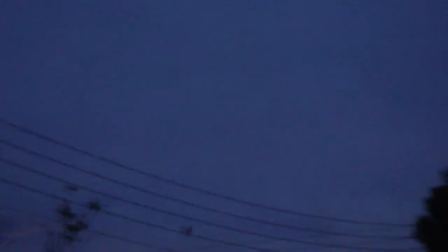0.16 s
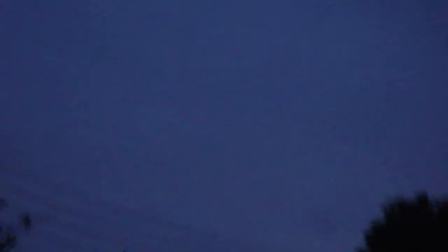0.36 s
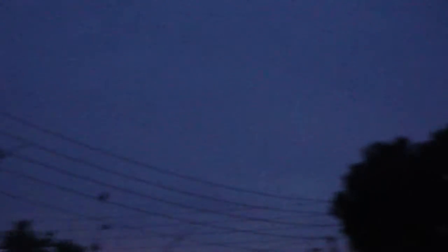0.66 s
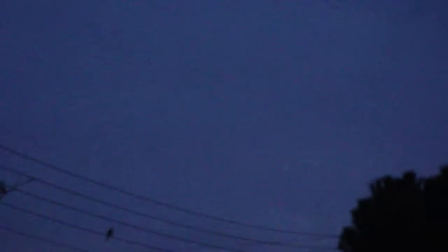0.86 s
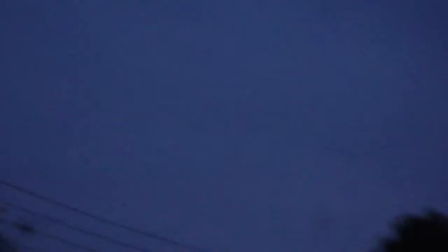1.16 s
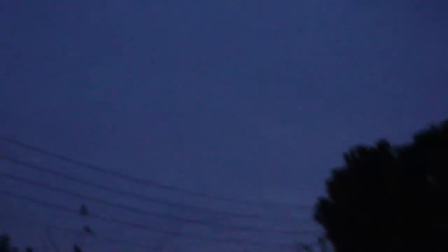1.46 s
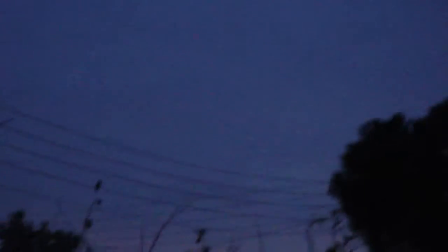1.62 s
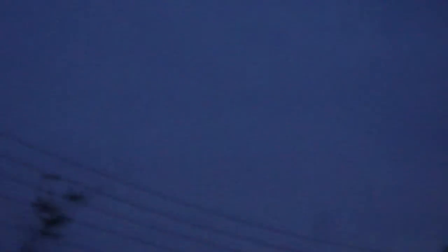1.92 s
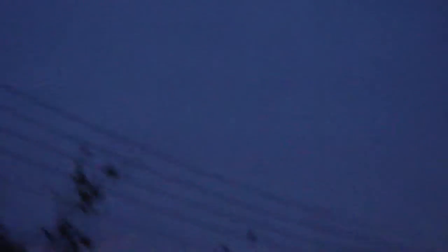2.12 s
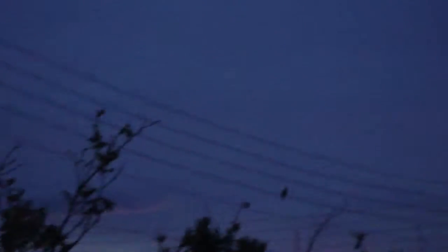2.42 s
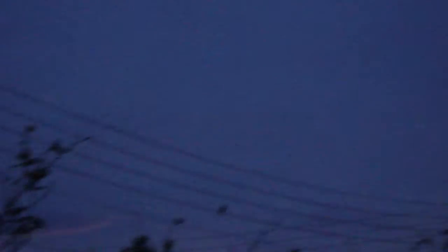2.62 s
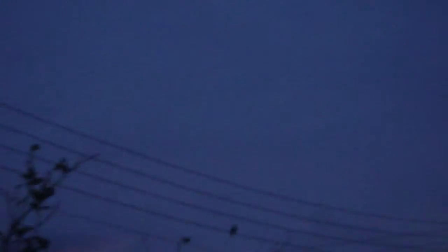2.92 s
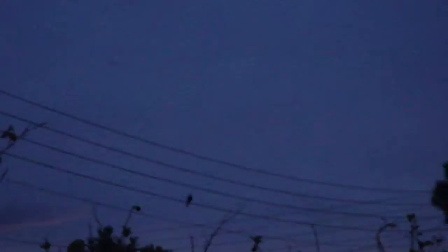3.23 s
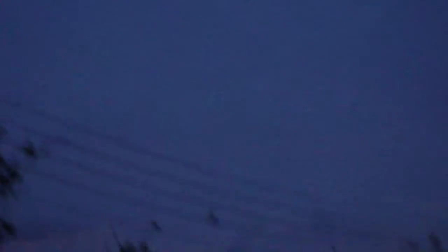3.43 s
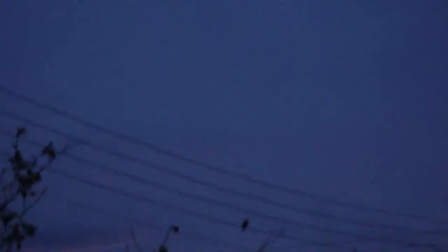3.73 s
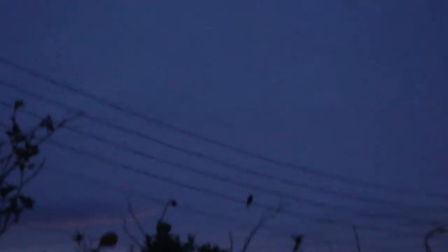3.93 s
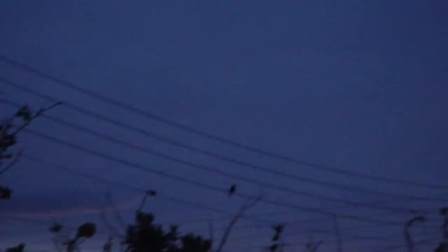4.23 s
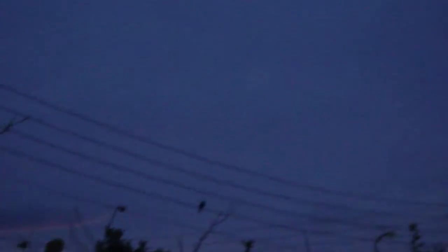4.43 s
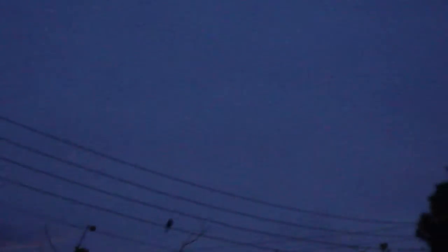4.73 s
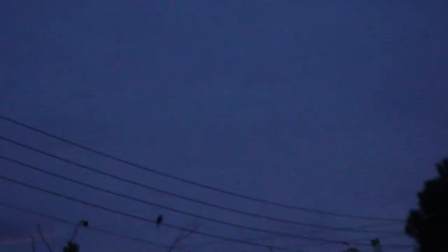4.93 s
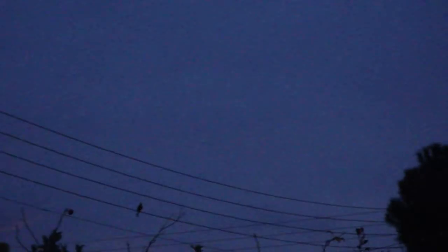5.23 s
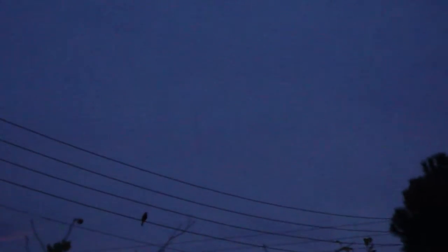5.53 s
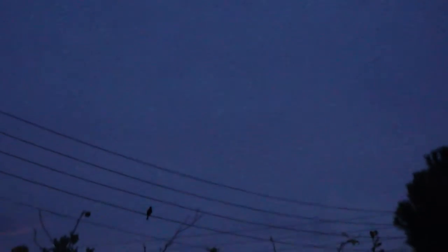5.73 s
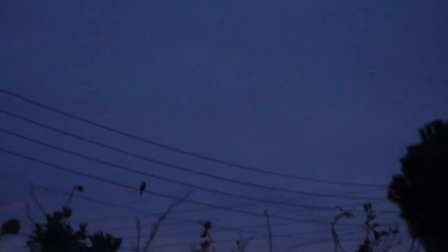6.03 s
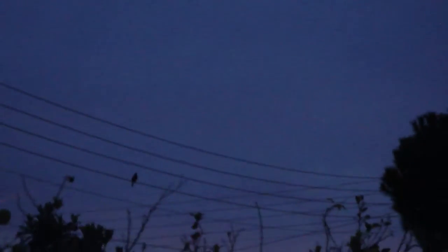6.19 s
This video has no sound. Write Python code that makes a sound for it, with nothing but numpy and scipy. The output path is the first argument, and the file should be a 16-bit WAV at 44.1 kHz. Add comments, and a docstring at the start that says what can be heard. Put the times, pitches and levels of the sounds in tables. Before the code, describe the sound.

A quiet outdoor dusk with soft distant town rumble, a thin faint hum and light leaf or cloth rustle. Far birds whistle at once; from 0.35 to 0.8 s a near blackbird gives a mellow fluted, wavering phrase. A reedy note follows at 0.9-1.1, a smooth whistle at 1.15, then a quick warbled roll from 1.35 to 1.65. At 1.95-2.3 come high squeaky notes and two falling swoops. The near bird then rests while distant whistles answer around 2.4-4.1, with blurred chatter and a very soft hoot near 3.1-3.6. Dull twig-like snaps and bright handling ticks are scattered throughout. From 4.9 the blackbird resumes with a low rising warble, a strong whistle at 5.3, a falling waver, then a high trill from 5.75, fading to a thin twitter by 6.35. Low wind puffs thump between 4.6 and 5.6. Light garden echoes surround the song.

```python
"""A blackbird sings in front: near-sine pitch paths with a faint octave make its fluted notes, slurs, warbles,
rolls, swoops and high trills, with one reedy partial stack; smeared echoes from walls and leaves answer it.
Far birds whistle and chatter in short gliding sines, and a soft hoot sounds once, over noise-band town rumble.
Snaps ring woody modes close by, a hand-held recorder ticks with bright clicks, leaves and cloth rustle as grains,
and wind hits the recorder's port as low noise and single puffs."""
import sys
import numpy as np
from scipy import signal
from scipy.io import wavfile

SR = 44100
rng = np.random.default_rng(int(sys.argv[2]) if len(sys.argv) > 2 else 0)


def wav_record(signal):
    """Record a signal, one row per channel, as 16-bit PCM in the file named by sys.argv[1]."""
    frames = np.transpose(np.atleast_2d(signal))
    bounded = np.clip(frames, -1, 1)
    # unit amplitude maps onto the largest positive 16-bit level
    quanta = np.round(bounded * 32767).astype(np.int16)
    wavfile.write(sys.argv[1], SR, quanta)


N = 280476


def from_db(db):
    """Amplitude ratio of a level in dB."""
    return 10 ** (np.asarray(db) / 20)


def rms_one(x):
    """Scale a signal to an RMS of 1."""
    return x / np.sqrt(np.mean(x ** 2) + 1e-20)


def band(x, low_hz, high_hz):
    """Band-pass filter with gentle skirts."""
    return signal.sosfilt(signal.butter(2, [low_hz, high_hz], "band", fs=SR, output="sos"), x)


def drift(rate_hz):
    """Slow random wander of RMS 1: noise through two equal one-pole low-passes."""
    r = np.exp(-2 * np.pi * rate_hz / SR)
    settled = signal.lfilter([1], [1, -2 * r, r * r], rng.standard_normal(N + SR))[SR:]
    return rms_one(settled)


def glide(t, s, v):
    """Smooth path through points: level at each inner turning point, never overshooting, as muscles move."""
    step = np.diff(v) / np.diff(s)
    product = step[1:] * step[:-1]
    inner = np.where(product > 0, 2 * product / (step[1:] + step[:-1] + 1e-12), 0)
    slope = np.r_[step[0], inner, step[-1]]
    k = np.clip(np.searchsorted(s, t) - 1, 0, len(s) - 2)
    h = s[k + 1] - s[k]
    u = (t - s[k]) / h
    ease = (v[k + 1] - v[k]) * u * u * (3 - 2 * u)
    bend = h * u * (1 - u) * (slope[k] * (1 - u) - slope[k + 1] * u)
    return v[k] + ease + bend


def columns(rows):
    """Sample numbers of a note and its columns glided along them."""
    s, *rest = np.transpose(rows)
    at = np.arange(int(s[0] * SR), min(int(s[-1] * SR), N))
    return at, [glide(at / SR, s, c) for c in rest]


def slur(start, length, turn, first_hz, turn_hz, last_hz, db, edge_db):
    """Three-point path: the level peaks at the turn and starts and ends edge_db under it."""
    turn_s = start + length * np.clip(turn, .1, .9)
    return [(start, first_hz, db - edge_db), (turn_s, turn_hz, db), (start + length, last_hz, db - edge_db)]


def add(out, at, hz, level_db, partials):
    """Sum of (multiple, dB) partials on a moving pitch, faded in and out over 2 ms."""
    phase = 2 * np.pi * np.cumsum(hz) / SR
    fade = np.clip(np.minimum(at - at[0], at[-1] - at) / 90, 0, 1)
    for multiple, db in partials:
        in_range = multiple * hz < SR / 3
        # the root of two makes the level an RMS level
        out[at] += np.sqrt(2) * fade * from_db(level_db + db) * np.sin(multiple * phase) * in_range


SPELL_EDGE_S = 0.077


def spells(t, rows):
    """How far (0-1) each spell, given by its start and length, is under way at times t."""
    return np.array([np.clip(np.minimum(t - row[0], row[0] + row[1] - t) / SPELL_EDGE_S + .5, 0, 1)
                     for row in rows])


SCATTER_T60_S = 0.72
# Wall echoes, before the treble lift: delay [t/s], level [level/dB], smear [t/s]
WALL_ECHOES = [(0.011, -6.5, 0.007), (0.028, -13, 0.0085), (0.044, -9, 0.0029), (.073, -11.5, 0.0022),
               (.12, -18.5, .018), (0.189, -26, 0.017), (.268, -34, 0.027)]


def garden(x, wet_db):
    """A few smeared wall echoes and a diffuse tail scattered by leaves, added to the direct sound."""
    t = np.arange(SR) / SR
    tail = rng.standard_normal(SR) * from_db(-60 * t / SCATTER_T60_S) * np.clip((t - .004) / 0.027, 0, 1)
    tail = from_db(wet_db) * tail / np.sqrt(np.sum(tail ** 2))
    for delay, db, width in WALL_ECHOES:
        smear = rng.standard_normal(SR) * np.exp(-((t - delay) / width) ** 2)
        tail += from_db(db) * smear / np.sqrt(np.sum(smear ** 2))
    bright_tail = signal.lfilter([1, -.15], [1], tail)  # leaves scatter the highs best
    return x + signal.fftconvolve(x, bright_tail)[:N]


# Shape of the town's spectrum: centre [f/Hz], relative density [level/dB per Hz]
TOWN_SPECTRUM = [(15, -65), (25, -54), (152, -9.5), (186, -17.5), (228, 2), (272, -6.5), (453, -2.5),
                 (584, -1), (697, -1.5), (876, -2), (1020, -4.5), (1610, -9.5), (2300, -8), (3120, -14),
                 (10800, -26.5), (14100, -63), (22000, -120)]
TOWN_DB = -51.5  # RMS of all bands together
# Thin hum: pitch [f/Hz], level before its lift and waver [level/dB]
HUM = [(301.5, -67.5)]


def town():
    """Far traffic and air as half-octave noise bands that waver slightly together, with a thin hum."""
    rumble, edges = 0, 22 * 2 ** np.arange(0, 9.2, .5)
    white = rng.standard_normal((2, N))  # alternate bands use separate noise
    spectrum_hz, spectrum_db = np.transpose(TOWN_SPECTRUM)
    together = drift(2.95)
    for k, (low, high) in enumerate(zip(edges, edges[1:])):
        level_db = np.interp(np.log(low * high) / 2, np.log(spectrum_hz), spectrum_db)
        rumble = rumble + from_db(level_db + 0.46 * together) * band(white[k % 2], low, high)
    t = np.arange(N) / SR
    hum = sum(from_db(db + 2.5 + 2.9 * drift(15.0)) * np.sin(2 * np.pi * hz * t) for hz, db in HUM)
    return from_db(TOWN_DB) * rms_one(rumble) + hum


# Wind on the port, calm and then gusty: time [t/s], level before the gusts waver [level/dB]
WIND_PATH = [(0, -72.5), (4.44, -72), (4.58, -56), (4.7, -61), (4.85, -52), (5.0, -58), (5.15, -62),
             (5.3, -56), (5.5, -54), (5.86, -67), (6.11, -60), (6.25, -70), (6.36, -56)]
# Wind puffs on the port: time [t/s], peak [level/dB]
PUFFS = [(4.558, -43), (4.74, -39), (4.814, -42), (4.867, -28.5), (4.888, -25.5), (4.897, -29.5),
         (4.911, -34), (4.945, -43), (5.067, -43), (5.218, -34), (5.226, -23), (5.245, -36), (5.268, -40),
         (5.285, -36), (5.343, -32), (5.464, -32.5), (5.501, -27), (5.532, -36.5), (5.562, -42),
         (5.627, -42)]
PUFF_HZ = 197.6


def wind():
    """Low noise in small lumpy gusts; each puff is a suck and a rebound, a short wave under a bell curve."""
    level_db = np.interp(np.arange(N) / SR, *np.transpose(WIND_PATH))
    out = from_db(level_db + 3.1 * drift(7.6)) * rms_one(band(rng.standard_normal(N), 55, 190))
    offset = np.arange(-400, 900)
    t = offset / SR
    puff = np.cos(2 * np.pi * PUFF_HZ * t + 0.23) * np.exp(-(2.14 * PUFF_HZ * t - .1) ** 2)
    for s, db in PUFFS:
        at = np.clip(int(s * SR) + offset, 0, N - 1)
        out[at] -= from_db(db) * puff
    return out


RUSTLE_DB = -63.0  # steady level
# Livelier rustling: start [t/s], length [t/s], lift over steady [level/dB]
RUSTLE_SPELLS = [(.27, 0.14, 3.5), (2.5, 0.23, 4.8), (4.18, 0.24, 5.2)]


def rustle():
    """Dense tiny clicks of leaves and cloth: random grains in a treble band."""
    lift_db = np.transpose(RUSTLE_SPELLS)[2] @ spells(np.arange(N) / SR, RUSTLE_SPELLS)
    size = from_db(0.7 * np.minimum(rng.exponential(1, N), 4))
    grains = size * rng.standard_normal(N) * (rng.random(N) < .2)
    return from_db(RUSTLE_DB + lift_db) * rms_one(band(grains, 2470, 11100))


CHATTER_DB, CHATTER_HZ = -75, 2517  # steady level and centre, between spells
CHATTER_SPREAD_DB = 11  # full range from the softest to the loudest chip
# Spells of louder chatter: start [t/s], length [t/s], lift over steady [level/dB], centre [f/Hz]
CHATTER_SPELLS = [(.4, 1.6, 10.5, 2976), (3.149, 0.17, 14, 3790), (3.6, 0.41, 10, 2534),
                  (4.0, 0.53, 15.4, 2597)]


def chatter():
    """Blurred far birds: many short chips at random moments, louder and moved in pitch during spells."""
    out, (_, _, more_db, spell_hz) = np.zeros(N), np.transpose(CHATTER_SPELLS)
    for when, high, slant, loud in rng.random((1100, 4)):
        start = when * (N / SR - .03)
        under_way = spells(start, CHATTER_SPELLS)
        centre_hz = CHATTER_HZ + under_way @ (spell_hz - CHATTER_HZ)
        pitch = centre_hz * (1 + 0.568 * (high - .5))
        at, (path,) = columns([(start, pitch), (start + 0.0078, pitch * (1 + 0.28 * (slant - .4)))])
        level_db = CHATTER_DB + under_way @ more_db + CHATTER_SPREAD_DB * (loud - .5)
        add(out, at, path, level_db, [(1, 0.0082)])
    return out


# Far whistles: start [t/s], length [t/s], turn [share 0-1], start, turn and end pitch before the 0.99 tuning
# and waver [f/Hz], peak before the level waver [level/dB]
FAR_NOTES = [(0.001, 0.11, .3, 3250, 3290, 3330, -64), (0.119, .17, 0.62, 2180, 2560, 2610, -51),
             (0.306, 0.16, .4, 2566, 2560, 2520, -52), (0.51, 0.059, .3, 4040, 3950, 3530, -63),
             (2.407, 0.1, .6, 2620, 2643, 2640, -49.5), (2.619, 0.13, .6, 2010, 2348, 2370, -42),
             (2.706, .19, .4, 2364, 2362, 2198, -41.5), (2.76, .14, .5, 2500, 2600, 2510, -53),
             (2.7, 0.25, 0.43, 1990, 2200, 2040, -51.5), (2.909, 0.083, .5, 2673, 2830, 2900, -47),
             (2.989, 0.072, .45, 2846, 2678, 2900, -41.5), (3.626, 0.2, .6, 2120, 2310, 2364, -52),
             (3.758, .12, 0.27, 2370, 2336, 2276, -51.5), (3.961, 0.104, .3, 2523, 2546, 2565, -50.5),
             (4.036, 0.15, 0.14, 1965, 1963, 1945, -56.5), (4.549, 0.2, 0.4, 1910, 1915, 1805, -61),
             (4.89, 0.074, .54, 2260, 2265, 2230, -57), (5.531, 0.171, 0.85, 2390, 2515, 2440, -43)]
FAR_EDGE_DB, FAR_WAVER_HZ = 5.5, 25.5  # drop at each end; RMS pitch waver before tuning
# Far chip runs: start [t/s], end [t/s], gap [t/s], middle level before scatter and waver [level/dB],
# first and last starting pitch before the 0.98 tuning and scatter [f/Hz]
CHIP_RUNS = [(3.142, 3.348, .024, -56, 3420, 3970), (4.287, 4.43, .042, -54.5, 2590, 2310)]
CHIP_S, CHIP_RISE = 0.014, 1.2  # chip length and pitch ratio from start to end
CHIP_SPREAD_DB, CHIP_SPREAD = 2.5, .04  # scatter of level, and of pitch as a share


def far_birds():
    """Plain whistles wavering in pitch and runs of short rising chips, all with a flickering level."""
    out, waver = np.zeros(N), FAR_WAVER_HZ * drift(9.1)
    for row in FAR_NOTES:
        at, (hz, db) = columns(slur(*row, FAR_EDGE_DB))
        add(out, at, hz + waver[at], db, [(0.99, 0.01)])
    for start, end, gap, db, first_hz, last_hz in CHIP_RUNS:
        for s, (loud, high) in zip(np.arange(start, end, gap), rng.standard_normal(size=(16, 2))):
            hz = np.interp(s, [start, end], [first_hz, last_hz]) * (1 + CHIP_SPREAD * high)
            at, (path,) = columns([(s, hz), (s + CHIP_S, hz * CHIP_RISE)])
            add(out, at, path, db + CHIP_SPREAD_DB * loud, [(0.98, 0)])
    return out * from_db(3.6 * drift(38) - 3.0)


# Faint hoot: start [t/s], length [t/s], turn [share 0-1], start, turn and end pitch [f/Hz],
# peak before the level waver [level/dB]
HOOT = (3.1, .55, .6, 1004, 1006, 1000, -57)


def hoot():
    """One soft plain tone of nearly steady pitch whose level wavers."""
    out = np.zeros(N)
    at, (hz, db) = columns(slur(*HOOT, edge_db=6.5))
    add(out, at, hz, db + 4.2 * drift(7.1)[at], [(1, 0)])
    return out


# Dull twig snaps close by: time [t/s], relative strength [level/dB]
SNAPS = [(.281, -28.5), (0.33, -40), (0.435, -32), (.974, -32), (0.993, -41), (1.02, -34), (1.496, -37),
         (1.921, -41), (1.935, -31), (2.539, -32), (2.604, -36.5), (2.624, -35), (2.666, -36), (3.418, -37),
         (3.426, -35.5), (3.503, -35)]
# Bright ticks under the fingers: time [t/s], relative strength [level/dB]
TICKS = [(0.2993, -37), (.3174, -44), (0.4428, -35.5), (2.633, -42), (3.9323, -40), (4.2097, -39.5),
         (4.3424, -43), (5.0565, -40), (5.4442, -43)]
# Woody modes of a snapping twig: pitch [f/Hz], relative strength [level/dB], time to fall 60 dB [t/s]
TWIG_MODES = [(730, -24, 0.0075), (1262, -2, 0.013), (1690, 9.5, 0.0036), (2440, -6.5, 0.016)]
CREAK_S, CREAK_DB = .005, -3.5  # typical lead and relative level of the crack before each snap
SNAP_WET_DB = -11.5


def handling():
    """Snaps, each led by a fainter crack, ring a few woody modes; ticks are bare bright clicks."""
    snaps = np.zeros(N)
    creaks = [(s - CREAK_S * rng.uniform(0.63, 1.34), db + CREAK_DB) for s, db in SNAPS]
    s, db = np.transpose(SNAPS + creaks)
    for hz, mode_db, t60 in TWIG_MODES:
        clicks = np.full(N, 1e-18)
        clicks[(s * SR).astype(int)] = from_db(db + mode_db - 6.0 + rng.normal(0, 1.9, len(s)))
        r, w = from_db(-60 / (t60 * SR)), 2 * np.pi * hz / SR
        snaps += signal.lfilter([0, np.sin(w)], [1, -2 * r * np.cos(w), r * r], clicks)
    s, db = np.transpose(TICKS)
    ticks = np.full(N, 1e-18)
    ticks[(s * SR).astype(int)] = from_db(db + 17.0)
    return garden(band(snaps, 690, 5100), SNAP_WET_DB) + band(ticks, 2700, 7200)


# Resonance near the beak: centre [f/Hz], width [f/Hz], strength against the fundamental [level/dB]
BEAK = (10500, 4500, -35.5)


def flute(hz, overtone_db):
    """A near-sine with its octave; faint upper partials show only where they meet the beak resonance."""
    beak_hz, width_hz, beak_db = BEAK
    upper = [(k, beak_db - 9.5 * ((k * hz - beak_hz) / width_hz) ** 2) for k in (3, 4, 5)]
    return [(1, 0.0034), (2, overtone_db)] + upper


OCTAVE_DB_PER_OCT = 11  # octave overtone's gain as a note dips under its median pitch
OCTAVE_STAYS = 0.75  # dB regained against the fundamental for each dB the note softens
THROAT_HZ, THROAT_DB_PER_OCT = 1790, 52  # below the throat's range the octave takes over


def voiced(at, hz, db, overtone_db):
    """A fluted note; the lower or softer it gets, the more its octave shows."""
    out = np.zeros(N)
    dip = OCTAVE_DB_PER_OCT * np.log2(np.median(hz) / hz)
    throat = THROAT_DB_PER_OCT * np.maximum(np.log2(THROAT_HZ / hz), 0)
    softening = OCTAVE_STAYS * (db.max() - db)
    add(out, at, hz, db, flute(hz, overtone_db + dip + throat + softening))
    return out


def sing_path(overtone_db, rows):
    """One fluted note along a path of time, pitch and level."""
    at, (hz, db) = columns(rows)
    return voiced(at, hz, db, overtone_db)


# The bird's levels below all stand before its shimmer; octave levels stand before the voice shapes them.
# Held notes: octave against the fundamental [level/dB], path of time [t/s], pitch [f/Hz], level [level/dB]
HELD_NOTES = [ (-30.5, [(.345, 2065, -48), (.365, 2192, -40), (.385, 2110, -37.5), (.408, 1308, -59.5),
              (.425, 1943, -37.5), (.44, 2188, -30.5), (.48, 2028, -31.5), (.53, 1993, -32),
              (.545, 1810, -47)]), (-35, [(1.135, 2230, -38.5), (1.16, 2406, -29), (1.2, 2368, -28),
              (1.235, 2063, -34)]), (-31.5, [(1.945, 2160, -64), (1.955, 3450, -42), (1.962, 5300, -65),
              (1.972, 3370, -35), (1.98, 2510, -39), (1.99, 3290, -36.5), (2.003, 2610, -41),
              (2.02, 3286, -30.5), (2.048, 4010, -40), (2.06, 3300, -44), (2.085, 3940, -48),
              (2.11, 3600, -58)]), (-39, [(5.23, 2027, -37.5), (5.26, 2220, -32.5), (5.33, 2382, -23),
              (5.4, 2514, -30), (5.435, 2424, -34)]), (-25.5, [(5.732, 6730, -66), (5.74, 4140, -23.5),
              (5.745, 5810, -51), (5.751, 4460, -22), (5.76, 4790, -27), (5.772, 4100, -39)])]


def held_notes():
    """Longer fluted notes, each following its own pitch path."""
    return sum(sing_path(overtone_db, path) for overtone_db, path in HELD_NOTES)


SLUR_EDGE_DB = 6.0
# Short slurs: start [t/s], length [t/s], turn [share 0-1], start, turn and end pitch [f/Hz],
# peak [level/dB], octave against the fundamental [level/dB]
SLURS = [(1.454, 0.011, 0.3, 1900, 2725, 1880, -25, -18), (1.464, 0.00765, 0.5, 2280, 1640, 1070, -34, -41),
         (1.372, 0.016, 0.42, 2820, 2890, 2930, -29, -22), (1.955, 0.018, 0.34, 1760, 2700, 2040, -38, -22),
         (2.015, .04, 0.7, 1510, 1976, 2000, -44, -27), (2.505, 0.082, 0.32, 2650, 2350, 1560, -45, -27),
         (5.465, .03, 0.68, 2496, 2840, 3100, -31.5, -26), (5.729, 0.01, 0.57, 4010, 2920, 2520, -32, -9.5),
         (6.206, 0.018, .45, 2530, 2940, 3400, -36.5, -11)]


def slurs(rows=SLURS):
    """Quick fluted glides, loudest at the turn."""
    return sum(sing_path(row[-1], slur(*row[:-1], SLUR_EDGE_DB)) for row in rows)


# Falling swoop, the two sides of the syrinx: time from its mark [t/s], pitch [f/Hz], level before gain [level/dB]
SWOOP_SIDES = [
    [(-.046, 5920, -57), (-.026, 6100, -48), (-.01, 5560, -41), (.004, 4740, -38.5), (.017, 3523, -33),
     (.026, 2955, -34.5)],
    [(-.01, 5200, -63), (0, 4260, -28.5), (.012, 3350, -32), (.027, 2960, -34.5), (.039, 2828, -39.5),
     (.051, 2190, -49)],
]
# Swoop repeats: mark [t/s], gain [level/dB]
SWOOPS = [(2.149, 1.5), (2.284, -1.7)]
SWOOP_OVERTONE_DB = -22.5


def swoops():
    """Falling cries in which both sides of the syrinx sound overlapping paths."""
    return sum(sing_path(SWOOP_OVERTONE_DB, np.array(side) + [mark, 0, gain_db])
               for mark, gain_db in SWOOPS for side in SWOOP_SIDES)


# Trill syllable: position [share of length], pitch [f/Hz], level before gain [level/dB]
TRILL_SYLLABLE = [(-.08, 7600, -44), (.02, 5900, -36.5), (.15, 4400, -27), (.52, 4790, -26.5),
                  (.8, 4680, -28.5), (1.0, 4350, -38)]
# Trill repeats: mark [t/s], length [t/s], gain [level/dB]
TRILLS = [(5.8, .029, 2.0), (5.862, .029, 1.0), (5.922, .026, -1.0), (5.983, .022, -2.5),
          (6.047, .021, -4.0), (6.118, .018, -8.0)]
# Lower slur leading into each syllable but the last: start from the mark [t/s], then the columns of SLURS
LEAD_IN = (-.021, .018, .35, 4060, 3800, 3300, -35.5, -12)
TRILL_OVERTONE_DB = -26


def trills():
    """High syllables on one stretched shape, each but the last led in by a lower slur."""
    lead_ins = [(mark + LEAD_IN[0], *LEAD_IN[1:]) for mark, *_ in TRILLS[:-1]]
    syllables = sum(sing_path(TRILL_OVERTONE_DB, np.array(TRILL_SYLLABLE) * [length, 1, 1] + [mark, 0, gain_db])
                    for mark, length, gain_db in TRILLS)
    return syllables + slurs(lead_ins)


# Warbles: (a crest [t/s], swing rate [f/Hz], lift at the widest crests [level/dB],
# octave against the fundamental [level/dB]), path of time [t/s], centre [f/Hz], level [level/dB], swing [f/Hz]
WARBLES = [((.595, 39.9, 2.6, -38), [(.586, 2520, -33, 150), (.6, 2470, -30, 190), (.64, 2310, -31.5, 250),
           (.7, 2200, -32, 170), (.74, 2250, -29.5, 110), (.76, 2310, -24.5, 10), (.79, 2300, -33.5, 0),
           (.82, 2290, -31.5, 0)]), ((5.115, 37.0, -4.0, -42), [(4.89, 1400, -54, 0),
           (4.92, 1620, -45.5, 0), (4.97, 1800, -41.5, 0), (5.035, 1880, -30.5, 20), (5.07, 2000, -35, 210),
           (5.11, 2200, -37, 520), (5.15, 2300, -44, 630), (5.182, 2250, -36, 580)]),
           ((5.576, 49.0, .2, -38), [(5.488, 2296, -35, 0), (5.51, 2068, -31, 16),
           (5.575, 1927, -36.5, 140), (5.62, 1790, -39.5, 180), (5.665, 1680, -46, 120)]),
           ((1.637, 77.0, 4.0, -25), [(1.632, 3200, -39, 560), (1.655, 3500, -50, 480)]),
           ((6.232, 88.0, -8.5, -34), [(6.221, 2600, -48, 400), (6.229, 4550, -37, 1260),
           (6.258, 5750, -42, 1140), (6.27, 6950, -42, 200), (6.281, 7420, -41, 0), (6.3, 7180, -41, 0),
           (6.358, 6260, -51, 0)])]


def warbles(rows=WARBLES):
    """Fluted notes whose pitch swings as a cosine, with the level tied to the swing."""
    out = np.zeros(N)
    for (crest, rate, crest_db, overtone_db), path in rows:
        at, (hz, db, swing) = columns(path)
        turns = (at / SR - crest) * rate
        if overtone_db is None:  # a roll syllable
            overtone_db = ROLL_OVERTONE_DB - ROLL_OVERTONE_FALL_DB * np.clip(turns + .5, 0, 1)
        wave = swing * np.cos(2 * np.pi * turns)
        out += voiced(at, hz + wave, db + crest_db * wave / swing.max(), overtone_db)
    return out


# Roll syllable: time from its first crest [t/s], centre before the pitch factor [f/Hz],
# level before gain [level/dB], swing before the pitch factor [f/Hz]
ROLL_SYLLABLE = [(-.021, 2720, -57, -9), (-.012, 2872, -38, -3), (.002, 4350, -30, 747),
                 (.013, 3696, -26, 740), (0.026, 2980, -35.5, 471), (.046, 2870, -37, 254)]
# Roll repeats: first crest [t/s], gain [level/dB], pitch factor [ratio]
ROLLS = [(1.34, -1.5, 1), (1.397, 1.5, 1.01), (1.461, 2, 1.02), (1.527, 0.5, 1.03), (1.596, -2.5, 1.04)]
ROLL_PER_S, ROLL_CREST_DB = 69, 2  # swings per second, lift at the widest crests
ROLL_OVERTONE_DB, ROLL_OVERTONE_FALL_DB = -15, 10  # reedy lead-in, purer across the first crest


def rolls():
    """Repeated warbled syllables that die away, each at its own pitch factor."""
    return warbles([((mark, ROLL_PER_S, ROLL_CREST_DB, None),
                     np.array(ROLL_SYLLABLE) * [1, pitch, 1, pitch] + [mark, 0, gain_db, 0])
                    for mark, gain_db, pitch in ROLLS])


# Reedy note's third partial: time [t/s], pitch [f/Hz], level before the stack's own [level/dB]
REED_PATH = [(0.86, 2304, -37), (0.875, 2796, -37), (0.89, 3043, -34.5), (0.93, 2990, -33),
             (0.99, 2948, -30), (1.02, 2860, -34), (1.06, 2950, -32.5), (1.083, 2830, -31)]
# Reedy partials: multiple of the fundamental [ratio], relative level [level/dB]; the first row stays silent
REED_STACK = [(1, -27), (2, -11), (3, 3), (4, -22.5), (5, -26), (6, -33), (7, -39), (8, -53), (9, -35),
              (10, -35), (11, -41)]


def reedy_note():
    """One reedy note: a stack strongest at its third partial, with no fundamental."""
    out = np.zeros(N)
    at, (hz, db) = columns(REED_PATH)
    add(out, at, hz / 3, db, REED_STACK[1:])
    return out


SHIMMER_DB, SHIMMER_PER_S = 1.6, 17  # RMS depth and drift rate


def blackbird():
    """The near song: all its notes and syllables; moving air makes the level shimmer."""
    song = held_notes() + slurs() + swoops() + trills() + warbles() + rolls() + reedy_note()
    return song * from_db(SHIMMER_DB * drift(SHIMMER_PER_S) - 2.0)


NEAR_WET_DB, FAR_WET_DB = -10, -4.0  # diffuse tails: far birds sit deeper in the garden


def scene():
    """Mix the near and far birds with the hoot, the background air and the close handling."""
    birds = garden(blackbird(), NEAR_WET_DB) + garden(far_birds() + chatter(), FAR_WET_DB)
    air = town() + wind() + rustle()
    return (birds + hoot() + air + handling())[None]


CUTOFF_HZ = 11000


def record(dry):
    """The small microphone loses the deep bass; the top is cut steeply."""
    thin = signal.sosfilt(signal.butter(2, 55.0, "high", fs=SR, output="sos"), dry)
    return signal.sosfilt(signal.ellip(12, .3, 75, CUTOFF_HZ, fs=SR, output="sos"), thin)


dry = scene()
out = record(dry)
wav_record(out)
```